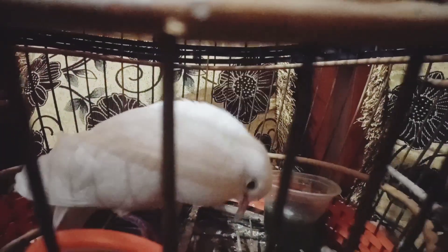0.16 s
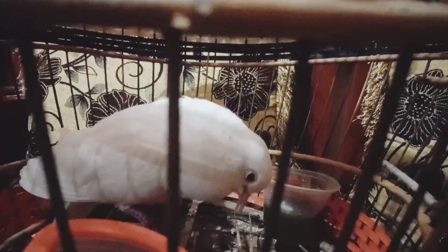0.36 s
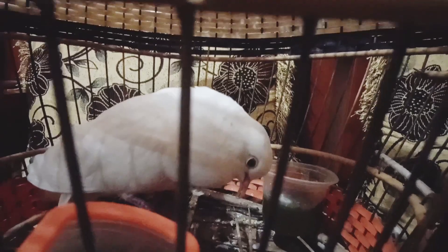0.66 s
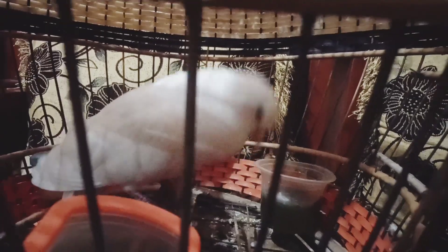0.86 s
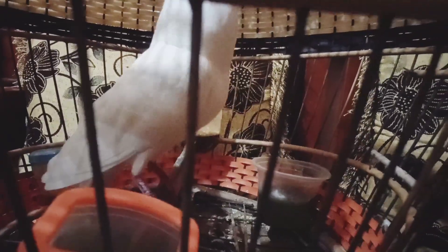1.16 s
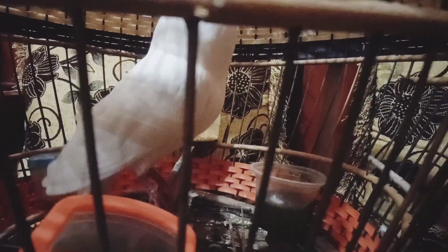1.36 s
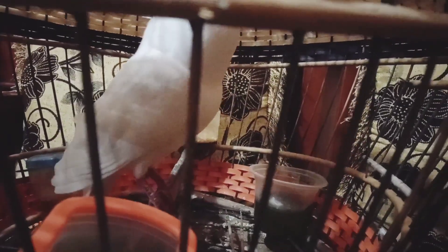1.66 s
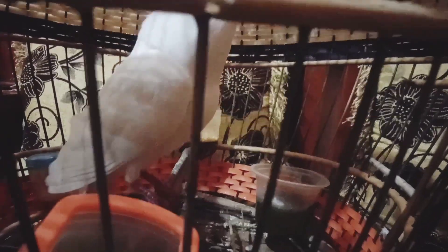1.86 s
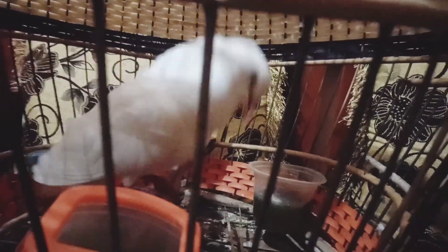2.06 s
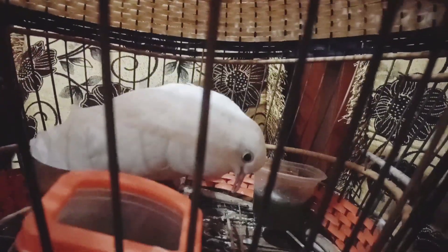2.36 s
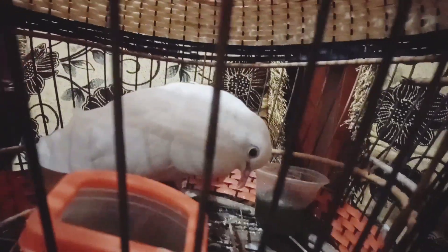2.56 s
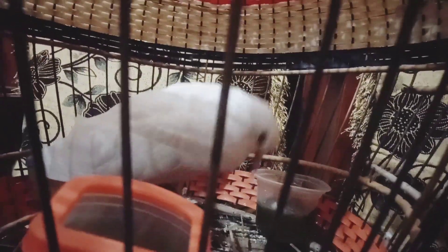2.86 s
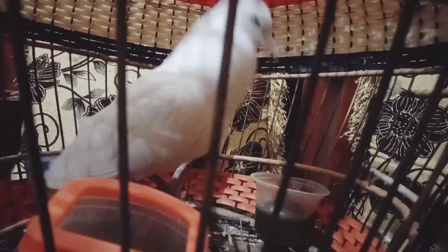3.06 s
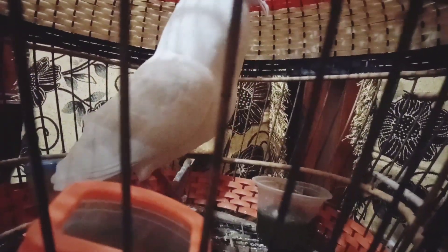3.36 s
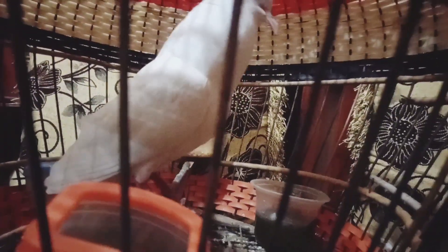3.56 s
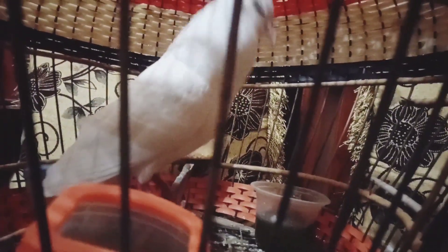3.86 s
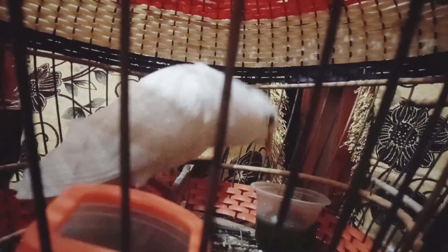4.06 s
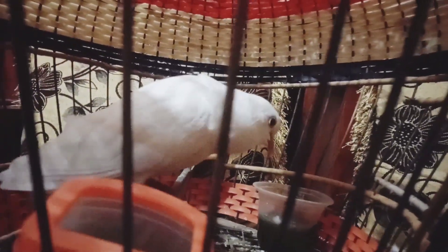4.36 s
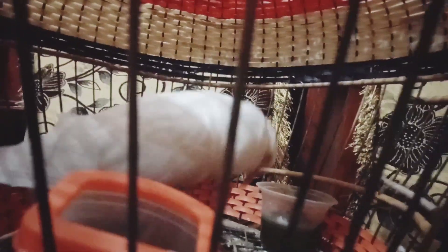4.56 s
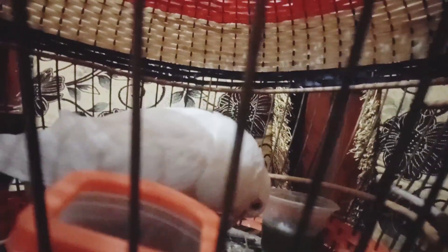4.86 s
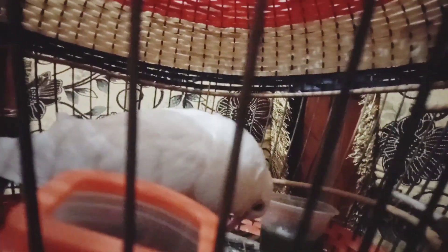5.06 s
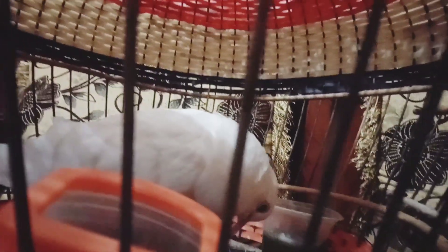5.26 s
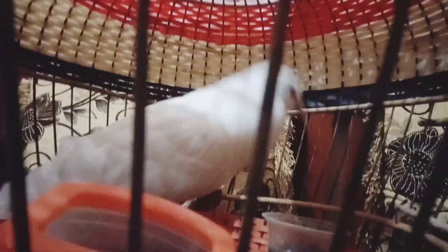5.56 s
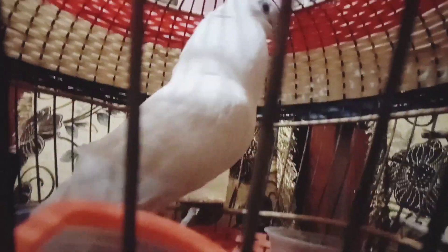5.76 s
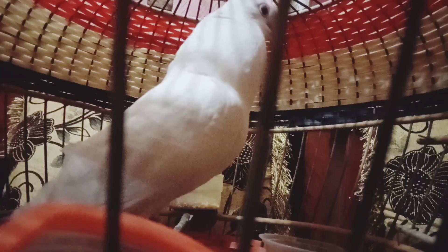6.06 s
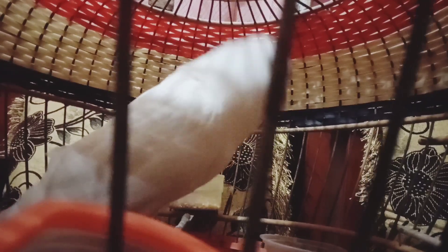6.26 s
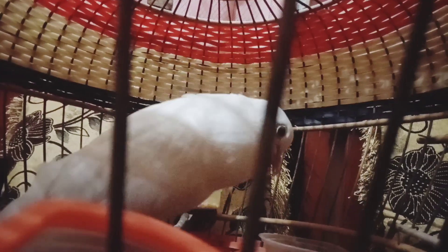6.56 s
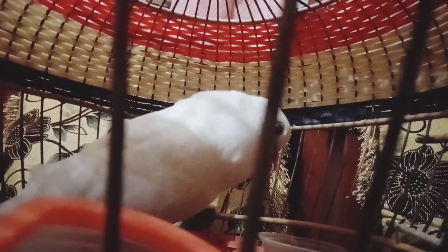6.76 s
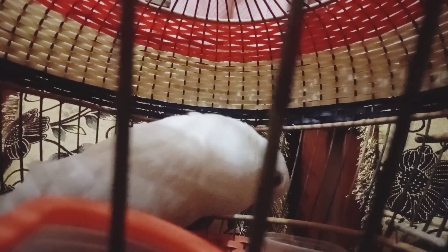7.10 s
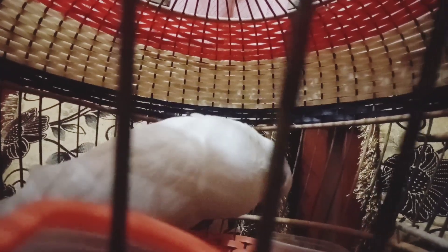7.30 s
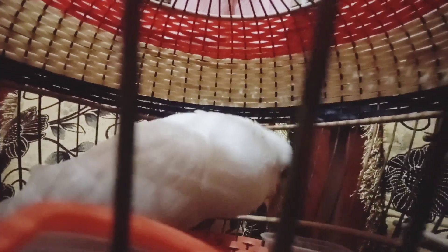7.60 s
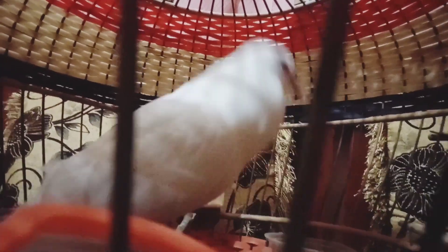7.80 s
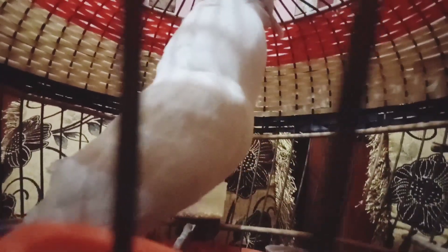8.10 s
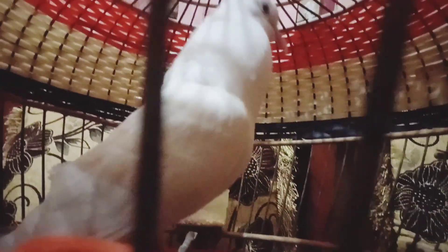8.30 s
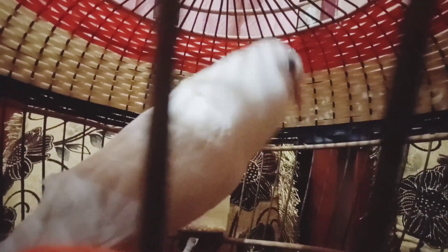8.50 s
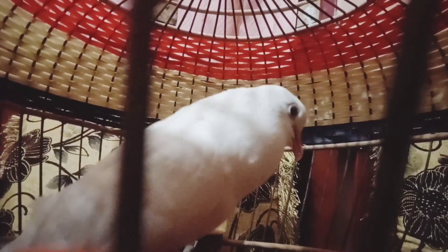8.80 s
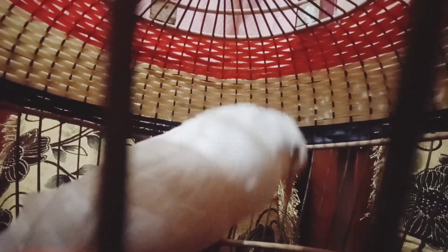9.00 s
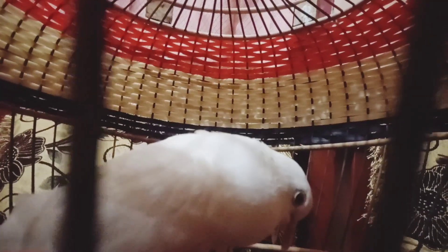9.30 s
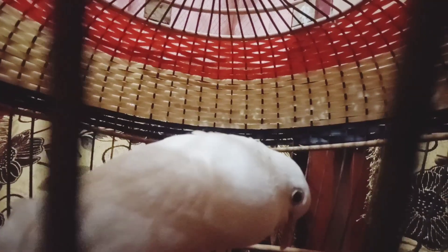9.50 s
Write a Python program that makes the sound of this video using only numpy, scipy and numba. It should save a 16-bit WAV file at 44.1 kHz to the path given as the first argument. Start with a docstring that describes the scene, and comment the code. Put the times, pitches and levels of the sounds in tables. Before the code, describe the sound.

Close, mellow dove calls over a soft fan with a rhythmic swish about five times a second. Four complete phrases go by, about two and a quarter seconds apart: hooted note, accelerating effort in a stuttered trill, long falling coo, low purring growl. Small claw clicks and feather rustles fall between. Late on, another dove answers across the first, and a fifth phrase is cut off during its trill. Small indoor space, short echoes.

```python
"""A fan hums and swishes as a caged dove close to a microphone bows and coos in a small room: a held note,
a trill that slows into a falling coo, then a low growl as it draws air. A second dove joins near the end.
The voices are gliding, nearly pure tones, and the growls are pulses through two throat resonances.
Claws tick as short noise bursts, feathers rustle as tiny noise grains, and the fan is a hum with coloured noise."""
import sys
import numpy as np
from scipy import signal
from scipy.io import wavfile
from scipy.ndimage import uniform_filter1d
from numba import njit

SR = 44100
rng = np.random.default_rng(int(sys.argv[2]) if len(sys.argv) > 2 else 0)


def generate_wav(sig):
    """Save sig (samples, or channels by samples) to the path in sys.argv[1] as 16-bit PCM at SR."""
    pcm = np.round(np.clip(np.atleast_2d(sig).T, -1, 1) * 32767).astype(np.int16)
    wavfile.write(sys.argv[1], SR, pcm)


N = 425124
T = np.arange(N) / SR

# Fan: steady air noise (f/Hz, relative level per Hz/dB)
AIR = [(36, -14), (60, -3), (80, -4.5), (160, -1), (240, -12), (300, 3.5), (600, -3.5), (1000, -15),
       (1700, -13), (2500, -9), (3500, -11.5), (5000, -34.5), (9000, -22.5), (16000, -30.5)]
# Fan: hiss of the blade rub (f/Hz, relative level per Hz/dB)
SWISH = [(1500, -18.5), (3000, 1.5), (4300, -1.5), (5300, -4.5), (7000, -0.5), (10000, -3), (15500, -6.5)]
# Fan: a blade rubs once per turn (share of turn, relative level/dB)
TURN = [(0, -16), (.05, -7), (.3, -2.5), (.45, 0), (.56, 0.5), (.75, -6), (1, -17)]
# Fan: guard resonances (f/Hz, width/Hz, relative level/dB)
GUARD = [(2550, 150, 4), (3210, 120, 5), (4350, 150, 8), (5900, 100, 0), (6900, 200, -3), (8400, 150, -3)]
AIR_DB, SWISH_DB, SWISH_RATE_HZ, SWISH_LOW_S = -50, -56, 5.222, .14
HUM_HZ, HUM_DB = 96, -57  # the middle of a wavering pitch and level

# Held notes (start t/s, end t/s, entry f/Hz, overshoot f/Hz, settled f/Hz, late f/Hz, level/dB,
# late level/dB, second harmonic level/dB, opening swell t/s, swell level/dB, closing ring level/dB)
HELD = [(.037, .308, 633, 651, 628, 645, -17.5, -21, -55, .004, -11.5, -26),
        (2.145, 2.43, 603, 635, 625, 640, -16, -21.5, -58, 2.109, -11.5, -25),
        (4.635, 4.897, 731, 777, 718, 731, -25, -30, -55, 4.598, -13.5, -31.5),
        (6.853, 7.143, 630, 681, 643, 646, -18.5, -18, -54, 6.82, -11, -27.5),
        (8.959, 9.265, 635, 685, 630, 648, -16.8, -18.5, -54, 8.931, -13.5, -28)]
# The pitch lingers faintly after a held note shuts (t after the end/s, relative level/dB)
RING_OUT = [(.008, -16), (.09, -30)]
POUCH_HZ, POUCH_T60_S = 504.3, 0.083  # T60: time to fade by 60 dB
SWELL_FROM_HZ, SWELL_TO_HZ = 403, 528
OVERSHOOT_S, SETTLE_S = .033, .105  # counted from the start of a held note
CREEP_S, LATE_S, SAG_HZ = .13, .045, 10  # the two times count back from its end
ENTRY_DB = -1.5  # a held note enters a little under its level
# a higher pitch lies further from the pouch resonance: softer, and less pure
DB_PER_HZ, SECOND_DB_PER_HZ = -.09, .1

# Trill notes (start t/s, length/s, level/dB)
TRILL = [(.436, .011, -32), (.478, .011, -30), (.517, .021, -31), (.57, .013, -24), (.612, .013, -20.5),
         (.653, .023, -18), (.698, .032, -17), (.749, .032, -16.5), (.8, .049, -17.5), (2.592, .019, -40.5),
         (2.641, .015, -22.5), (2.689, .013, -21), (2.732, .016, -18.5), (2.775, .024, -18),
         (2.823, .033, -18.5), (2.878, .036, -17), (2.932, .061, -16), (5.073, .009, -39.5),
         (5.107, .021, -44), (5.154, .021, -45), (5.2, .012, -22.5), (5.24, .02, -18.5), (5.287, .018, -19),
         (5.333, .028, -18), (5.385, .043, -18), (5.445, .066, -16), (7.326, .016, -39.5),
         (7.369, .018, -33.5), (7.412, .015, -25), (7.456, .015, -20), (7.498, .024, -17.5),
         (7.543, .033, -17), (7.597, .037, -18.5), (7.651, .05, -18), (9.415, .035, -37.5),
         (9.473, .032, -41), (9.535, .022, -27), (9.576, .015, -22), (9.621, .017, -17.5)]
# Trill pitch rises with effort (level/dB, f/Hz)
TRILL_PITCH = [(-40, 538), (-25, 566), (-20, 572), (-17, 587)]
# Faint high notes as a growl begins (start t/s, length/s, level/dB, f/Hz)
MURMURS = [(8.42, .025, -46, 646), (8.47, .028, -43, 658)]
RISE_SHARE, LONGEST_RISE_S = .52, .012
FLICK_LEAD_S, FLICK_S, FLICK_DB, FLICK_HZ = .012, .014, -25, 668  # a high flick just before each coo

# Falling coos (start t/s, crest t/s, crest f/Hz, crest level/dB, full voice t/s, full f/Hz, full level/dB,
# register change t/s, its level/dB, lower tone enters t/s, is strongest t/s, level there/dB, end t/s)
COOS = [(.875, .962, 648, -19, 1.045, 615, -14.2, 1.228, -12.5, 1.07, 1.118, -20.5, 1.505),
        (3.017, 3.1, 638, -17, 3.24, 603, -14.5, 3.425, -13, 3.2, 3.284, -20, 3.83),
        (5.532, 5.622, 648, -18, 5.93, 586, -12.5, 6.047, -11, 5.89, 6, -24, 6.293),
        (7.722, 7.83, 662, -17.5, 8.03, 597, -11.5, 8.232, -11.5, 8.1, 8.18, -40, 8.41)]
# Dip that opens a coo (t after its start/s, f/Hz, level/dB, second harmonic level/dB)
ONSET = [(0, 597, -15, -58), (.012, 594, -16, -66), (.028, 570, -14.5, -66), (.05, 590, -17, -63)]
# Register change (t around it/s, f/Hz, relative level/dB, second harmonic level/dB)
CHANGE = [(-.025, 565, -2.5, -61), (0, 545, 0, -58), (.016, 499, -1.5, -49)]
# Slide after the change (share of the rest, f/Hz, relative level/dB, second harmonic level/dB)
FALL = [(.16, 488, -4, -49), (.5, 472, -8, -52), (.72, 455, -12, -55), (.89, 428, -18, -54),
        (.96, 407, -24, -64), (1, 400, -36, -77)]
# One coo cracks upwards (t/s, f/Hz, level/dB, second harmonic level/dB)
VOICE_BREAK = [(7.842, 755, -22, -64), (7.862, 760, -27, -68), (7.89, 715, -27, -66),
               (7.929, 697, -24, -64)]
CREST_SECOND_DB, FULL_SECOND_DB, UNDER_SECOND_DB = -53, -60, -69  # second harmonics
UNDER_HZ, UNDER_ENTRY_DB, UNDER_SAG_DB, UNDER_BUILD_S = 516, -36, -5, .03  # the lower tone
SUM_TONE_DB, SIDE_TONE_DB = -23.5, 8  # gains on the mixing products of the two registers

# Claws on perch and wicker (t/s, relative level/dB)
TICKS = [(1.3748, -27.5), (1.5182, -39), (1.708, -37), (1.7235, -41), (1.793, -35), (2.009, -34.5),
         (2.0447, -30), (3.108, -35), (3.3558, -35.5), (4.583, -28.5), (4.9422, -42), (6.3041, -39),
         (6.3361, -19), (6.3599, -27), (6.3899, -41), (6.402, -38), (6.454, -31), (6.779, -32),
         (7.6226, -35), (7.7957, -39), (8.063, -37), (8.4936, -34), (9.0897, -39)]
# Feathers rustle as the bird shifts (loudest t/s, spread/s, relative level/dB)
RUSTLE = [(1.37, .035, -50), (1.74, .04, -49.5), (1.99, .07, -48), (3.3, .12, -59), (6.36, .045, -50),
          (6.5, .07, -52), (6.73, .045, -47), (7.5, .5, -59), (8.8, .12, -53.5), (9.5, .3, -60)]
TICK_T60_S, RUSTLE_FLOOR_DB = .02, -68

# Growls on the indrawn air (t/s, pulse rate f/Hz, relative level/dB, roughness 0-1,
# lower resonance f/Hz, upper resonance f/Hz, upper resonance relative level/dB)
GROWLS = [
    [(1.6, 111, -60, .39, 526, 650, -2), (1.656, 108, -40, .33, 524, 650, 1),
     (1.762, 132, -48, .22, 500, 670, 4), (1.87, 139, -45, .35, 497, 695, 3),
     (1.942, 145, -40, .37, 510, 760, 5), (1.99, 135, -35, .4, 512, 870, 4),
     (2.045, 133, -34, .5, 520, 800, 3), (2.09, 126, -40, .4, 510, 616, -5)],
    [(3.87, 121, -49, .37, 517, 636, 0), (3.91, 127, -35, .33, 515, 645, -8),
     (3.95, 135, -35, .3, 513, 660, -8), (4.058, 125, -50, .2, 497, 705, 2),
     (4.132, 126, -47.5, .07, 484, 736, 4), (4.384, 125.5, -47, .05, 486, 743, 5),
     (4.466, 132, -47.5, .06, 487, 745, 5), (4.532, 124, -41, .13, 492, 744, -4),
     (4.58, 121, -54, .18, 500, 740, 0)],
    [(6.355, 123, -44, .28, 400, 500, 2), (6.39, 127, -34, .2, 410, 530, 6),
     (6.42, 136, -35.5, .15, 420, 557, 10), (6.54, 140, -38, .32, 436, 563, 8),
     (6.59, 140, -36, .27, 487, 700, 8), (6.667, 142, -38, .4, 490, 715, 9),
     (6.74, 127, -38, .55, 470, 780, 9), (6.8, 128, -54, .7, 473, 760, -2)],
    [(8.42, 97, -46, .47, 403, 474, -6), (8.5, 98, -43, .42, 398, 510, -6),
     (8.543, 118, -39, .36, 403, 522, 2), (8.6, 128, -31, .22, 418, 527, 4),
     (8.66, 134, -30, .45, 412, 545, 6), (8.74, 137, -33, .45, 420, 706, 7),
     (8.795, 143, -33.5, .5, 550, 815, 7), (8.86, 131, -33, .6, 640, 790, 2),
     (8.92, 128, -40, .93, 636, 750, -2)],
]
# A wider throat lets more through (upper resonance f/Hz, highest open harmonic f/Hz, open band level/dB)
OPENING = [(480, 620, -19), (560, 800, -17), (650, 870, -10), (740, 970, -3), (800, 1010, -5),
           (875, 1450, -3)]
# Thin whistles during the growls (start t/s, end t/s, first f/Hz, last f/Hz, relative level/dB)
WHISTLES = [(6.566, 6.67, 6240, 6350, -61), (8.69, 8.91, 5750, 5950, -57)]
LOW_WIDTH_HZ, HIGH_WIDTH_HZ = 125, 100
CHEST_DB, CHEST_SECOND_DB = -16.5, -13  # growl fundamental radiated by the chest, and its second harmonic

# Second dove, one list per call (t/s, f/Hz, level/dB)
MATE = [
    [(7.825, 390, -36), (7.836, 437, -25.5), (7.885, 650, -18.5), (7.931, 569, -19.5), (8.064, 502, -23.5),
     (8.103, 495, -20), (8.152, 457, -33), (8.199, 416, -30)],
    [(8.76, 390, -35), (8.79, 470, -24.5), (8.833, 502, -16.5), (8.885, 552, -22), (8.947, 490, -19.5),
     (8.975, 512, -18.5), (9.015, 496, -19), (9.141, 491, -17), (9.313, 486, -20.5), (9.36, 488, -17.5),
     (9.372, 525, -24), (9.385, 495, -15.5), (9.43, 497, -15), (9.5, 475, -21.5), (9.556, 484, -17.5),
     (9.639, 469, -25)],
]
MATE_SECOND_DB, MATE_THIRD_DB = -29, -9  # second harmonic below the tone, third below the second
MATE_PURER_HZ, MATE_PURER_DB = (505, 545), -8  # purer over this pitch range and above

# Echoes from the near walls (delay t/s, level/dB)
ECHOES = [(.019, -19.5), (.031, -24), (.047, -26.5), (.068, -26)]
ROOM_T60_S, ROOM_DB = .42, -21.5
PORT_HZ, PORT_WIDTH_HZ, PORT_DB = 7646, 1620, 10.5
TOP_HZ = 15450


def gain(db):
    """Turn decibels into a gain."""
    return 10 ** (np.asarray(db) / 20)


def level(x, db):
    """Scale a sound to an rms level."""
    return x * gain(db) / np.sqrt(np.mean(x ** 2))


def walk(rate):
    """Random levels held for 1 / rate s and smoothed twice; spread near 1."""
    hold = int(SR / rate)
    steps = np.repeat(rng.standard_normal(N // hold + 1), hold)
    return 1.3 * uniform_filter1d(uniform_filter1d(steps, hold), hold)[:N]


def add(out, start_s, x):
    """Mix x into out from a given time."""
    i = int(start_s * SR)
    out[i:i + len(x)] += x[:N - i]


def read(table, fade_s):
    """Read a curve table's columns sample by sample, with a fade for both ends."""
    s, *columns = np.transpose(table)
    t = np.arange(s[0], s[-1], 1 / SR)
    fade = np.clip(np.minimum(t - s[0], s[-1] - t) / fade_s, 0, 1)
    return [np.interp(t, s, c) for c in columns], fade


@njit
def bandpass(x, hz, width):
    """State-variable band-pass with a moving centre, gain 1 at the centre."""
    y, band, low = np.empty(len(x)), 0., 0.
    for i in range(len(x)):
        g, k = np.tan(np.pi * hz[i] / SR), width[i] / hz[i]
        v = (band + g * (x[i] - low)) / (1 + g * (g + k))
        band, low, y[i] = 2 * v - band, low + 2 * g * v, k * v
    return y


def fixed_bandpass(x, hz, width_hz):
    """The same band-pass with a centre that stays put."""
    return bandpass(x, np.full(len(x), 1. * hz), np.full(len(x), 1. * width_hz))


def tone_phase(hz):
    """Phase of an oscillator that follows a pitch curve."""
    return 2 * np.pi * (np.cumsum(hz) / SR + rng.random())


def coloured(spectrum, flicker_db):
    """Noise in bands a third of an octave apart, each flickering alone."""
    hz, db = np.transpose(spectrum)
    out = 0
    for centre in hz[0] * 2 ** np.arange(0, np.log2(hz[-1] / hz[0]), 1 / 3):
        band = fixed_bandpass(rng.standard_normal(N), centre, centre / 4)
        band = fixed_bandpass(band, centre, centre / 2)
        band_db = np.interp(np.log(centre), np.log(hz), db) + flicker_db * walk(30)
        out = out + gain(band_db) * band
    return level(out, 0)


def fan():
    """Wavering motor hum, steady air, and a grainy rub once per turn that also rings the guard."""
    hum = np.sqrt(2) * gain(HUM_DB + 2 * walk(12)) * np.sin(tone_phase(HUM_HZ + 6 * walk(14)))
    turn = (SWISH_RATE_HZ * (T - SWISH_LOW_S) + 0.021 * walk(3.5)) % 1
    rub_db = SWISH_DB + np.interp(turn, *np.transpose(TURN))
    rub = gain(rub_db + 0.5 * walk(12) + 2 * walk(45) + 2.3 * walk(300))
    knock = rub * rng.standard_normal(N) * gain(4.3 * walk(80))
    guard = sum(gain(db) * fixed_bandpass(knock, hz, width_hz) for hz, width_hz, db in GUARD)
    air = gain(AIR_DB) * coloured(AIR, flicker_db=.6)
    return hum + air + rub * coloured(SWISH, flicker_db=1.0) + guard


def pouch():
    """A rising tone swells towards the pouch resonance; when the voice jumps above it or stops, it rings out."""
    out, t = np.zeros(N), np.arange(int(.15 * SR)) / SR
    ring = np.exp(-np.log(1000) * t / POUCH_T60_S)
    drop = gain(-7) + (1 - gain(-7)) * np.exp(-(t / .004) ** 2)  # quick drop as the swell ends
    for start, end, *_, opens, swell_db, stop_db in HELD:
        rise = np.arange(0, 1, 1 / SR / (start - .003 - opens))
        hz = np.r_[SWELL_FROM_HZ + (SWELL_TO_HZ - SWELL_FROM_HZ) * rise, POUCH_HZ + 0 * t]
        shape = np.r_[rise ** 1.2, ring * drop]
        add(out, opens, np.sqrt(2) * gain(swell_db) * shape * np.sin(tone_phase(hz)))
        closing = (1 - np.exp(-t / 0.0011)) * ring * np.sin(tone_phase(POUCH_HZ + 0 * t))
        add(out, end + .005, np.sqrt(2) * gain(stop_db) * closing)
    return out


def held_notes():
    """Each note's curve overshoots, settles, moves to its late pitch and sags as it shuts."""
    tables = []
    for start, end, entry, over, hz, late, db, late_db, second_db, *_ in HELD:
        early = [(start + s, f, db + ENTRY_DB + DB_PER_HZ * max(f - hz, 0),
                  second_db + SECOND_DB_PER_HZ * (f - hz))
                 for s, f in ((0, entry), (OVERSHOOT_S, over), (SETTLE_S, hz))]
        closing = [(end - CREEP_S, hz, db, second_db), (end - LATE_S, late, late_db, second_db),
                   (end, late - SAG_HZ, late_db - 1.5, second_db - 6)]
        lingering = [(end + s, late - SAG_HZ, late_db + rel, second_db + rel) for s, rel in RING_OUT]
        tables.append(early + closing + lingering)
    return tables


def coos(tables, third_db=-20):
    """Closed beak and swollen throat leave almost a pure, trembling tone; returns tone and harmonics."""
    pure, overtones, tremble = np.zeros(N, complex), np.zeros(N), walk(60)
    for table in tables:
        (hz, db, second_db), fade = read(table, .006)
        start = table[0][0]
        shake = tremble[int(start * SR):][:len(hz)]
        phase = tone_phase(hz * (1 + 0.0035 * shake))
        # complex, so that two tones can be multiplied into clean mixing products
        add(pure, start, np.sqrt(2) * fade * gain(db + 0.28 * shake) * np.exp(1j * phase))
        harmonics = np.sin(2 * phase) + gain(third_db) * np.sin(3 * phase)
        add(overtones, start, np.sqrt(2) * fade * gain(second_db + 2.5 * shake[::-1]) * harmonics)
    return pure, overtones


def trill():
    """Trill notes, flicks and murmurs swell and die in a rounded shape; longer ones enter sharper, then settle."""
    out, tremble = np.zeros(N), walk(64)
    notes = [(s, length, db, np.interp(db, *np.transpose(TRILL_PITCH))) for s, length, db in TRILL]
    flicks = [(coo[0] - FLICK_LEAD_S, FLICK_S, FLICK_DB, FLICK_HZ) for coo in COOS]
    for start, length, db, hz in notes + MURMURS + flicks:
        rise = min(RISE_SHARE * length, LONGEST_RISE_S)
        t = np.arange(0, length + .005, 1 / SR)
        edge = np.clip(np.minimum(t / max(rise, .002), (t[-1] - t) / min(.55 * length, .016)), 0, 1)
        phase = tone_phase(hz * (1 + 2.5 * length * np.exp(-t / .007)))
        shake = tremble[int(start * SR):][:len(t)]
        rounded = np.sin(edge * np.pi / 2)[:len(shake)] ** 1.44
        note = (np.sin(phase) + gain(-46.5) * np.sin(2 * phase))[:len(shake)]
        add(out, start - .003, np.sqrt(2) * gain(db + 1.2 * shake) * rounded * note)
    return out


def falling_coos():
    """The voice dips, crests and slides as a lower tone grows beneath; it drops to about there and sinks away."""
    voice, under_tone = [], []
    for (start, crest, crest_hz, crest_db, full, full_hz, full_db, change, db,
         under, strongest, under_db, end) in COOS:
        onset = [(start + s, *rest) for s, *rest in ONSET]
        body = [(crest, crest_hz, crest_db, CREST_SECOND_DB), (full, full_hz, full_db, FULL_SECOND_DB)]
        drop = [(change + s, hz, db + rel, second) for s, hz, rel, second in CHANGE]
        fall = [(change + u * (end - change), hz, db + rel, second) for u, hz, rel, second in FALL]
        voice.append(onset + body + drop + fall)
        steps = [(under, UNDER_ENTRY_DB), (strongest - UNDER_BUILD_S, UNDER_ENTRY_DB + 4),
                 (strongest, under_db), (change, under_db + UNDER_SAG_DB)]
        under_tone.append([(s, UNDER_HZ, step_db, UNDER_SECOND_DB) for s, step_db in steps])
    return voice, under_tone


def cracked(tables):
    """The break silences the coo voice that it falls in and sounds in its place."""
    first, last = VOICE_BREAK[0][0], VOICE_BREAK[-1][0]
    out = [VOICE_BREAK]
    for table in tables:
        if table[0][0] < first < table[-1][0]:
            s, *columns = np.transpose(table)
            stop, resume = ((t, *(np.interp(t, s, c) for c in columns)) for t in (first, last))
            out.append([row for row in table if row[0] < first] + [stop])
            out.append([resume] + [row for row in table if row[0] > last])
        else:
            out.append(table)
    return out


def cage():
    """Claw ticks are short bright noise bursts; feather rustle is dense tiny grains."""
    ticks, t = np.zeros(N), np.arange(int(.06 * SR)) / SR
    for start, db in TICKS:
        add(ticks, start, gain(db) * rng.standard_normal(len(t)) * np.exp(-np.log(1000) * t / TICK_T60_S))
    grains = level(rng.standard_normal(N) * gain(4.4 * walk(400)), 0)
    moves = sum(gain(db) * np.exp(-((T - s) / spread) ** 2) for s, spread, db in RUSTLE)
    rustle = grains * (gain(RUSTLE_FLOOR_DB) + moves)
    bright = signal.sosfilt(signal.butter(2, 4000, "high", fs=SR, output="sos"), ticks)
    return gain(-5.5) * bright + signal.sosfilt(signal.butter(1, 1500, "high", fs=SR, output="sos"), rustle)


def growls():
    """Slow syrinx (voice organ) pulses excite two throat resonances and an open band; roughness adds air."""
    out = np.zeros(N)
    opening, *passes = np.transpose(OPENING)
    for table in GROWLS:
        (hz, db, rough, low_hz, high_hz, high_db), fade = read(table, 0.012)
        n = len(hz)
        top_hz, open_db = (np.interp(high_hz, opening, c) for c in passes)
        phase = tone_phase(hz * (1 + 0.067 * rough * walk(140)[:n]))
        pulses = sum(np.cos(k * phase) / (1 + (k * hz / top_hz) ** 8) for k in range(1, 13))
        pulses = pulses * gain(5.4 * rough * walk(129.2)[:n])  # uneven strength
        air = bandpass(rng.standard_normal(n), 0.75 * top_hz, top_hz)
        pulses = pulses + 2.8 * rough * air * (1 + .6 * np.cos(phase))
        low, high = (bandpass(bandpass(pulses, f, w + 0 * f), f, 2 * w + 0 * f)
                     for f, w in ((low_hz, LOW_WIDTH_HZ), (high_hz, HIGH_WIDTH_HZ)))
        band = pulses
        for _ in range(3):
            band = bandpass(band, 0.76 * top_hz, top_hz)
        throat = low - gain(high_db) * high - gain(open_db) * band
        chest = gain(CHEST_DB) * np.cos(phase) + gain(CHEST_SECOND_DB) * np.cos(2 * phase)
        add(out, table[0][0], fade * gain(db) * (throat + chest))
    return out


def whistles():
    """Thin, unsteady tones that glide during the growls."""
    out = np.zeros(N)
    for start, end, first_hz, last_hz, db in WHISTLES:
        u = np.arange(0, 1, 1 / SR / (end - start))
        hz = first_hz + (last_hz - first_hz) * u + 25 * walk(80)[:len(u)]
        swell = gain(db - 2 + 5 * walk(90)[:len(u)]) * np.sin(np.pi * u) ** 0.34
        add(out, start, swell * np.sin(tone_phase(hz)))
    return out


def second_dove():
    """Curves of the second dove's calls, whose second harmonic weakens at higher pitch."""
    return [[(s, hz, db, db + MATE_SECOND_DB + np.interp(hz, MATE_PURER_HZ, (0, MATE_PURER_DB)))
             for s, hz, db in call] for call in MATE]


def doves():
    """Voice and lower tone share one membrane, so they also give a sum tone and a side tone on overlap."""
    held, held_high = coos(held_notes(), third_db=-11)
    voice, under_tone = falling_coos()
    upper, upper_high = coos(cracked(voice), third_db=-16)
    lower, lower_high = coos(under_tone)
    calls = second_dove()
    first_call, first_high = coos(calls[:1])
    later_call, later_high = coos(calls[1:], third_db=MATE_THIRD_DB)
    mixed = gain(SUM_TONE_DB) * upper * lower + gain(SIDE_TONE_DB) * upper ** 2 * lower.conj()
    tones = (held + upper + lower + first_call + later_call + mixed).imag
    return tones + held_high + upper_high + lower_high + first_high + later_high


def room(x):
    """Echoes from the near walls, with a decaying noise tail."""
    t = np.arange(int(.5 * SR)) / SR
    tail = rng.standard_normal(len(t)) * np.exp(-np.log(1000) * t / ROOM_T60_S) * (t > .02)
    tail = tail / np.sqrt(np.sum(tail ** 2)) * gain(ROOM_DB)
    for delay_s, db in ECHOES:
        add(tail, delay_s, gain([db]))
    return signal.fftconvolve(x, tail)[:N]


def scene():
    """Doves and cage in the room, over the fan."""
    near = pouch() + doves() + trill() + cage() + growls() + whistles()
    return (fan() + near + room(near))[None]


def record(dry):
    """The microphone port resonates in the treble; the top is cut."""
    port = fixed_bandpass(dry[0], PORT_HZ, PORT_WIDTH_HZ)
    top_cut = signal.ellip(10, .2, 70, TOP_HZ, fs=SR, output="sos")
    return signal.sosfilt(top_cut, dry + gain(PORT_DB) * port)


dry = scene()
out = record(dry)
generate_wav(out)
```